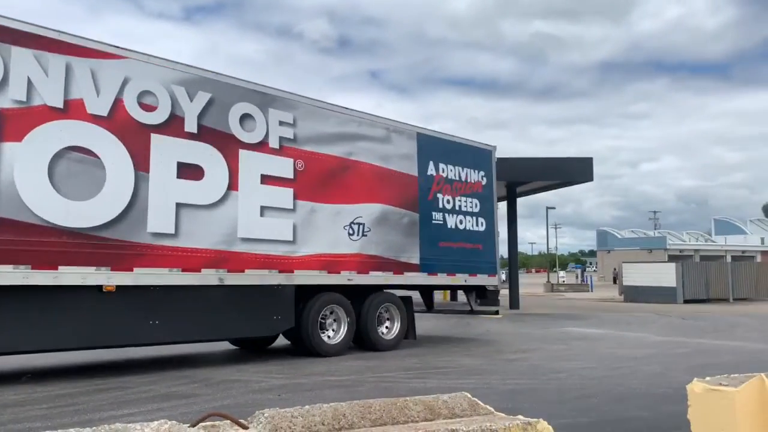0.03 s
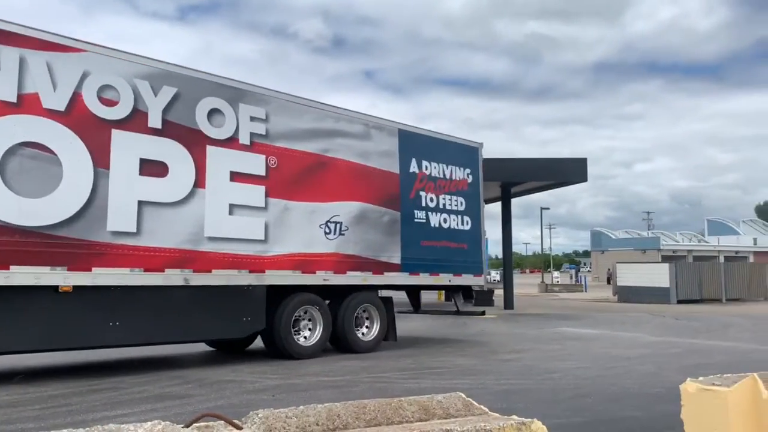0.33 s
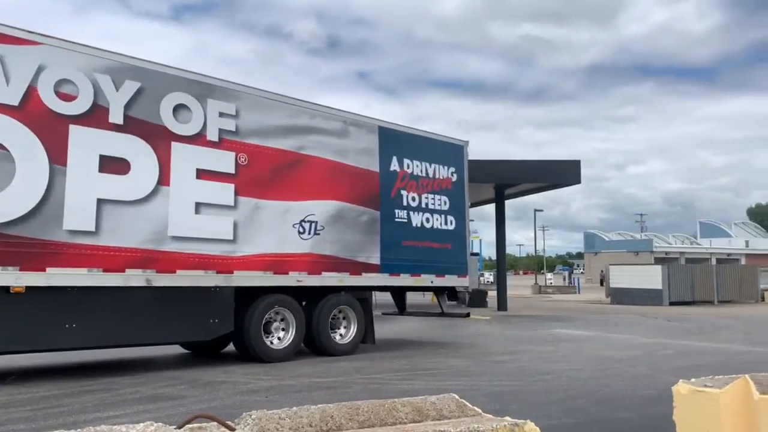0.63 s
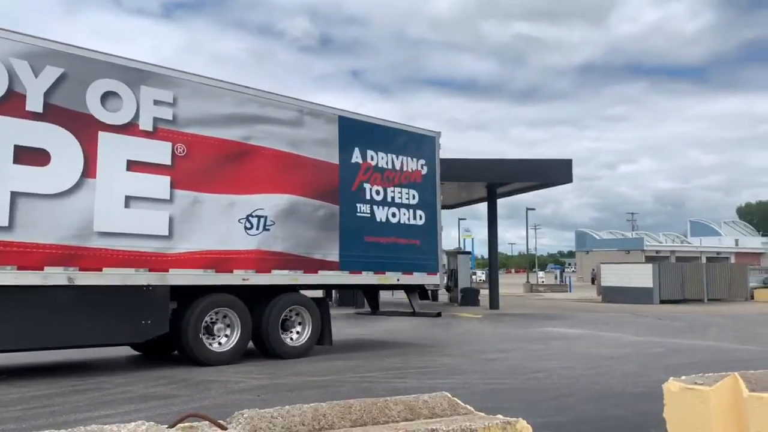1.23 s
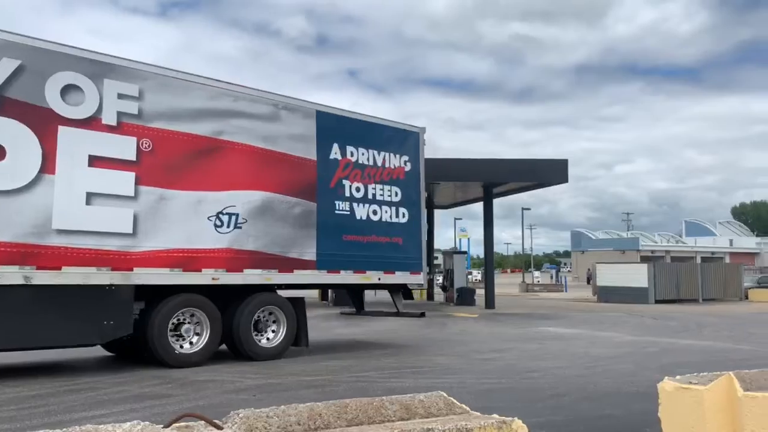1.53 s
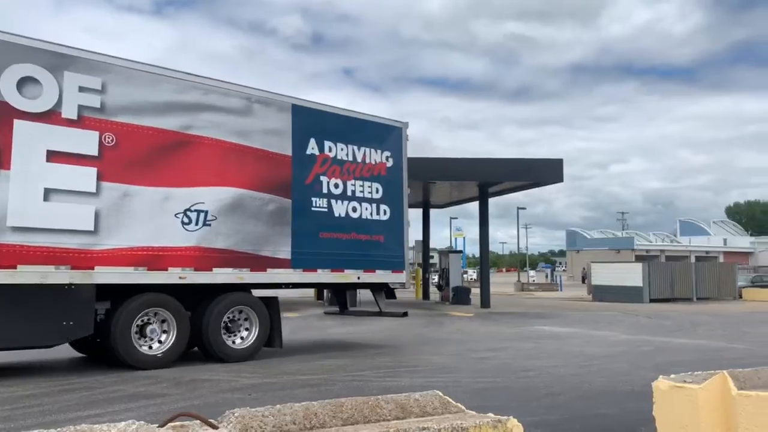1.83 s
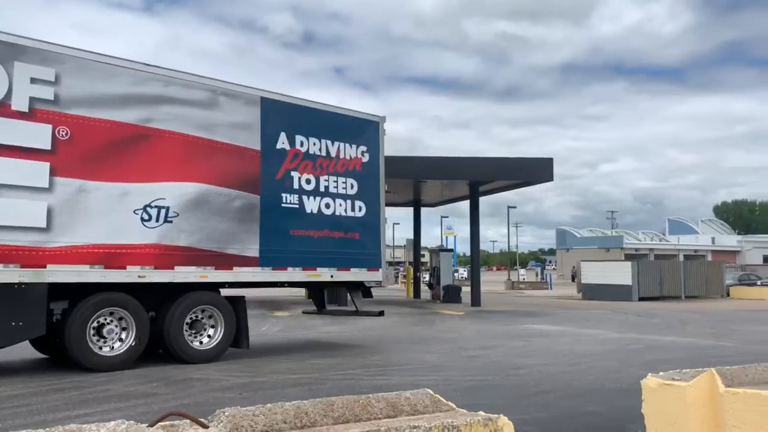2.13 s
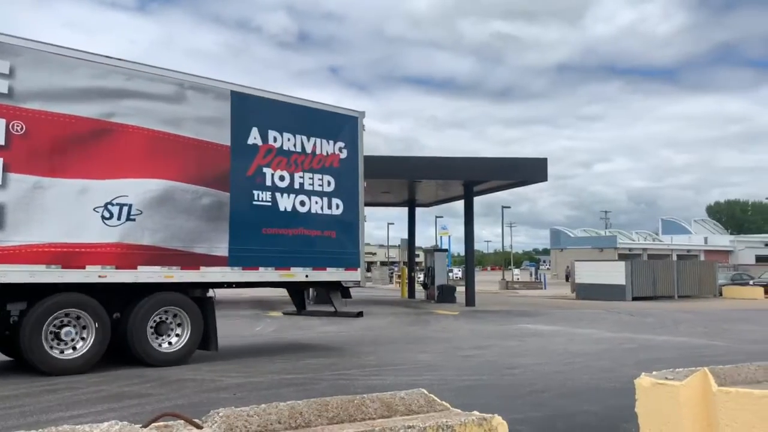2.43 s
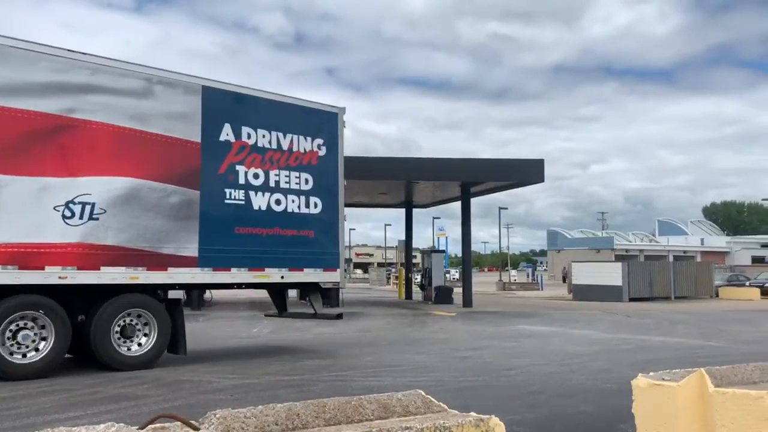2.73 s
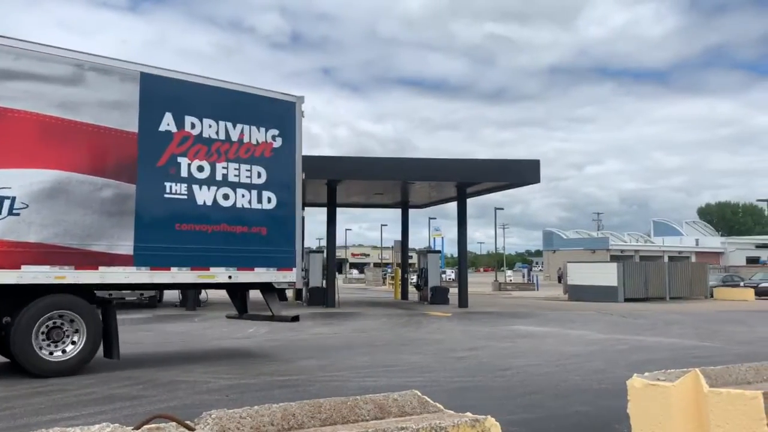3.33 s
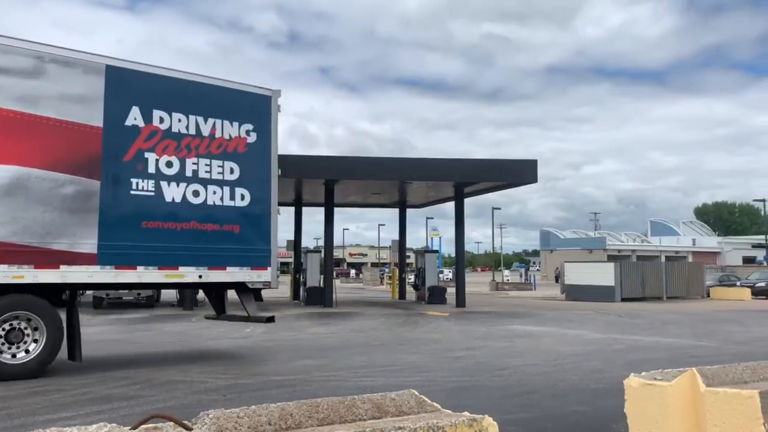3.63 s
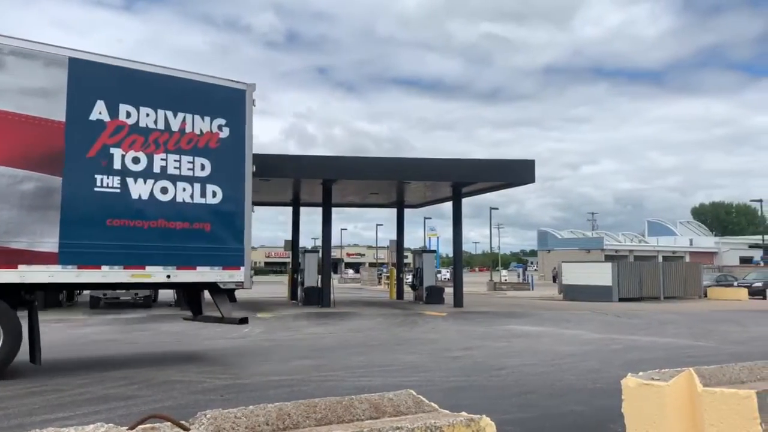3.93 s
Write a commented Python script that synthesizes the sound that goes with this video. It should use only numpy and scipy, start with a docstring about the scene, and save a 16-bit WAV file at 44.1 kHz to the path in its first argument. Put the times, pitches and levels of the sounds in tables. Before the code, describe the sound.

A diesel truck and trailer pass slowly, with rumbling, light chirping and a thin whine.

```python
"""A diesel truck hauls its trailer slowly past on the left of a paved lot, exhaust droning over tyre noise.
From the start a second diesel idles nearby, its deep rumble throbbing five times a second, a turning
part chirps, and a machine hum and a thin, wandering whine carry on throughout. At 1.3 s the trailer
thumps and the drone starts to recede. At 3 s a loose fitting clanks and the drone briefly returns,
then a gritty rush swells as the trailer's tail comes by."""
import sys
import numpy as np
from scipy.fft import rfft, irfft, next_fast_len
from scipy.io import wavfile
from scipy.ndimage import map_coordinates

SR = 44100
rng = np.random.default_rng(int(sys.argv[2]) if len(sys.argv) > 2 else 0)


def put_to_file(sound):
    """Save the sound as 16-bit audio at rate SR, in the file named by the first command-line argument."""
    columns = np.atleast_2d(sound).T  # one column per channel
    safe = np.clip(columns, -1, 1)
    whole_steps = np.round(safe * 32767)
    wavfile.write(sys.argv[1], SR, whole_steps.astype(np.int16))


N = 176400

# How alike the two channels of a noise are: frequency_hz, correlation
STEREO_LIKENESS = [(50, .995), (170, .97), (280, .9), (420, .8), (500, .7), (700, .9), (950, .78),
                   (1150, .35), (1450, .72), (1680, .78), (1940, .35), (2420, .93), (2950, .85),
                   (3170, .52), (3350, .8), (4300, .75), (5000, .52), (5500, .15), (8000, .4)]
# Left channel's level over the right: frequency_hz, gain_db
LEFT_BALANCE = [(60, -1.8), (170, 0.5), (300, 0.5), (490, 5.5), (750, 3.5), (1000, 2), (1230, 2),
                (1550, -2), (2300, .6), (2700, -3), (3400, -0.1), (4250, -0.8), (4800, -5), (5450, 3.5),
                (5850, -3), (8000, 1.5)]
# Left channel's phase lead: frequency_hz, lead_rad
LEFT_LEAD = [(0, 0), (250, 0.7), (750, 1.7), (950, 1.7), (1170, 2.7), (1350, 1.9), (1600, 3.7), (1880, 5),
             (2020, 3.4), (2250, 5.7), (3000, 8.3), (3600, 9.5), (3900, 11.7), (4300, 12.4), (5100, 14.3),
             (5300, 16.5), (6000, 18), (8400, 19)]
# Machine hum: time_s, pitch_hz, level_db
HUM_CURVE = [(0, 297, -64), (.6, 297, -53), (1.2, 300, -51), (2.2, 298.9, -54), (2.7, 300.8, -49.5),
             (3.3, 301, -49.5), (4, 301, -48)]
# Glide of the whine: time_s, pitch_hz
WHINE_PITCH = [(0, 8950), (.17, 9280), (.3, 9290), (.4, 9050), (.58, 9400), (.75, 9540), (.92, 9430),
               (1.03, 9510), (1.15, 9380), (1.21, 9180), (1.32, 9070), (1.46, 9400), (1.66, 9620),
               (1.82, 9510), (1.93, 9580), (2.15, 9490), (2.26, 9310), (2.4, 9360), (2.57, 9130),
               (2.85, 9040), (2.97, 9250), (3.14, 9330), (3.27, 9570), (3.38, 9600), (3.47, 9480),
               (3.52, 9230), (3.62, 9510), (3.8, 9790), (3.88, 9800), (4, 9480)]
# Fader ride on the whine: time_s, level_db
WHINE_FADER = [(0, -68), (.2, -53), (.41, -60), (.6, -48), (.85, -53), (1.0, -52), (1.3, -53.5),
               (1.44, -58), (1.68, -50), (1.8, -56.5), (2.05, -50.5), (2.3, -57.5), (3.15, -58.5),
               (3.35, -44.5), (3.52, -53.5), (3.66, -45), (3.86, -46.5), (4, -46.5)]
# Fader rides on idle rumble, tyres and body, and diesel clatter: time_s, rumble_db, body_db, clatter_db
NOISE_FADERS = [(0, -37.5, -40, -46.5), (.4, -43, -40.5, -46.5), (.85, -42.5, -39, -48),
                (1.3, -46.5, -41.5, -47.5), (1.7, -44.5, -41, -49.5), (2.2, -48.5, -42.5, -49),
                (2.7, -40.5, -42.5, -49), (3.2, -44.5, -42, -49), (3.6, -44.5, -43, -50),
                (4, -43.5, -41, -50)]
# Partials of the idling diesel: cycle_multiple, level_db
IDLE_PARTIALS = [(6, -70), (9, -47), (11, -57.5), (12, -44.5), (13, -52.5), (17, -49.5), (20, -51.5),
                 (37, -60.5)]
# Fader ride on those partials: time_s, gain_db
THROB_FADER = [(0, -0.5), (.7, .5), (1.8, 3.5), (2.3, -0.5), (2.8, -3.5), (3.3, -1), (4, -6)]
# Colour of the idle rumble: frequency_hz, gain_db
RUMBLE_EQ = [(15, -27), (32, -16.5), (42, -5), (50, -6.5), (62, 1), (78, -2.5), (100, -7), (130, -7),
             (200, -19.5), (400, -49.5)]
# Fader rides on the two gear tones: time_s, low_tone_db, high_tone_db
GEAR_FADERS = [(0, -46, -57), (.35, -57.5, -57), (.6, -54, -63), (.9, -51.5, -48), (1.4, -76, -64),
               (2.7, -66, -54.5), (4, -70, -63)]
# Chirps of the turning part: peak_s, level_db
CHIRP_CUES = [(0.047, -39.5), (0.225, -38), (.41, -40.5), (.595, -41.5), (.777, -38.5), (0.963, -45),
              (1.147, -43), (1.333, -38), (1.519, -39), (1.701, -40), (1.887, -42.5), (2.07, -44),
              (2.257, -38.5), (2.442, -40), (2.626, -43), (2.81, -42), (2.992, -40.5), (3.176, -40.5),
              (3.542, -47), (3.91, -43)]
# Rubs within one revolution: delay_s, gain_db
CHIRP_RUBS = [(0, -2), (.032, -10.5), (0.118, -9.5)]
# Fader ride on the rush of the trailer's tail: time_s, level_db
TAIL_FADER = [(0, -82), (3.3, -64.5), (3.6, -49), (3.88, -43.5), (4, -57.5)]
# Throaty colour of that rush: frequency_hz, gain_db
TAIL_EQ = [(420, -5), (800, -8), (930, 6), (1050, -3.5), (1620, -11), (1760, 0), (1900, -22), (5000, -34)]
# Strikes of the loose fitting: start_s, level_db
CLANK_CUES = [(3.013, -37), (3.0165, -36), (3.0215, -34.5), (3.032, -42)]
# Ring of its steel: pitch_hz, gain_db
STEEL_MODES = [(1880, -7), (2340, -3), (2520, 4.5), (2830, -2.5), (4010, -6.5)]
# Colour of its crack and echo: frequency_hz, gain_db
CLANK_EQ = [(800, -12), (1400, 1), (1850, 3.5), (2080, -7.5), (2480, 3.5), (2850, 1), (3300, -4),
            (4000, -14), (5000, -15.5), (8000, -29)]
# Hollow ring of the trailer: pitch_hz, gain_db, t60_s
TRAILER_MODES = [(244, 6.5, 0.055), (1190, -12, .04)]
# Colour of the truck's tyres and body: frequency_hz, gain_db
BODY_EQ = [(60, -40), (120, 1), (180, 1), (270, -4.5), (400, -6), (520, -6.5), (610, -3.5), (680, -1.5),
           (780, -6), (870, -4.5), (1020, -8.5), (1400, -8.5), (2000, -21), (4000, -49.5)]
# Colour of its diesel clatter: frequency_hz, gain_db
CLATTER_EQ = [(600, -26), (1300, -3.5), (1660, 5.5), (1920, 1), (2200, 3.5), (2500, 5.5), (2720, 4),
              (2930, 6.5), (3080, -1), (3600, -0.5), (3780, -1), (4300, -3), (4500, -5), (5100, -7.5),
              (5330, -7), (5650, -12.5), (6050, -7.5), (6500, -15), (7200, -26), (8400, -8.5),
              (9900, -32.5)]
# Panels and pipes ringing within the clatter: pitch_hz, gain_db
PANEL_RINGS = [(1770, -10), (2520, -11.5), (2930, -17.5), (4050, -18.5)]
# The truck's engine: time_s, firing_hz, overtones_db
ENGINE_CURVE = [(0, 69.83, -41), (.55, 69.66, -37.5), (.9, 69.85, -39.5), (1.3, 70, -39.5),
                (1.7, 70.3, -48), (2.2, 69.77, -48), (2.7, 70.2, -48.5), (3.1, 69.9, -43),
                (3.6, 70.45, -54.5), (4, 71.2, -59)]
# Overtones of its exhaust: firing_multiple, gain_db
EXHAUST_OVERTONES = [(2, -2.5), (3, -12), (4, -15.5), (5, -17), (7, -21.5)]


def amp(db):
    """Decibels to gain."""
    return 10 ** (np.asarray(db) / 20)


def unit(x):
    """Scale to rms 1."""
    return x / np.sqrt(np.mean(np.abs(x) ** 2) + 1e-20)


def along(points, hz):
    """Read (frequency_hz, value) points on a log frequency axis."""
    freqs, values = np.transpose(points)
    return np.interp(np.log(hz + 1), np.log(freqs + 1), values)


def curves(rows):
    """Automation: one value per sample for each column after the time."""
    times, *columns = np.transpose(rows)
    return [np.interp(np.arange(N) / SR, times, column) for column in columns]


def wobble(rate):
    """A smooth random curve, rate knots a second."""
    knots = rng.standard_normal(int(N * rate / SR) + 4)
    return map_coordinates(knots, [np.arange(N) * rate / SR])


def phase_of(hz):
    """Running phase of a pitch curve."""
    return 2 * np.pi * np.cumsum(hz) / SR


def filtered(x, response):
    """Pass x through a complex frequency response."""
    size = next_fast_len(N + SR // 2)
    return irfft(rfft(x, size) * response(np.fft.rfftfreq(size, 1 / SR)), size)[..., :N]


def rush(eq):
    """Coloured stereo noise of rms 1, partly alike in the two channels."""
    def response(hz):
        width = np.arccos(np.clip(along(STEREO_LIKENESS, hz), -1, 1)) / 2
        return amp(along(eq, hz)) * np.array([np.cos(width), np.sin(width)])
    mid, side = filtered(rng.standard_normal((2, N)), response)
    return unit(np.array([mid + side, mid - side]))


def tone(phase, flutter_db=1.3, drift_rad=.2):
    """A slightly unsteady tone of rms 1."""
    flutter = amp(flutter_db * wobble(9.1))
    return unit(flutter * np.sin(phase + rng.uniform(0, 2 * np.pi) + drift_rad * wobble(6.8)))


def narrow(centre_hz, width_hz):
    """A thin noise band of rms 1, reaching width_hz either side of a fixed or moving centre."""
    a, b = filtered(rng.standard_normal((2, N)), lambda hz: 1 / np.sqrt(1 + (hz / width_hz) ** 6))
    phase = phase_of(np.full(N, centre_hz))
    return unit(a * np.cos(phase) + b * np.sin(phase))


def from_left(x):
    """Sound from the left reaches the left microphone first, with a different colour on each side."""
    half = np.array([[.5], [-.5]])
    def response(hz):
        lead = np.interp(hz, *np.transpose(LEFT_LEAD))
        return amp(half * along(LEFT_BALANCE, hz)) * np.exp(1j * half * lead)
    return filtered(x, response)


def hum():
    """A machine holds one nearly steady note."""
    hz, db = curves(HUM_CURVE)
    return amp(db) * tone(phase_of(hz))


def whine(wander_hz=22, jitter_hz=31.11, compression_smear_db=-58.5):
    """A fuzzy high whistle wanders in pitch; a smear of audio-compression hiss sits just below it."""
    (hz,), (db,) = curves(WHINE_PITCH), curves(WHINE_FADER)
    hz = hz + wander_hz * wobble(18)
    core = unit(np.sin(phase_of(hz + jitter_hz * wobble(70))))
    whistle = amp(-4) * narrow(hz, width_hz=110) + amp(-1.5) * core
    return amp(db + wobble(22.05)) * whistle + amp(compression_smear_db) * narrow(hz - 120, width_hz=234)


def idling_diesel(cycle_hz=4.995, beat_s=.19, swell_depth=.65, chug_depth=.5):
    """Unequal cylinders swell tones and rumble once a cycle and chug unevenly on each crank turn."""
    cycle = 2 * np.pi * cycle_hz * (np.arange(N) / SR - beat_s)
    rumble_db, throb_db = curves(NOISE_FADERS)[0], curves(THROB_FADER)[0]
    throb = sum(amp(db) * unit(np.cos(k * cycle + .15 * wobble(2.8))) for k, db in IDLE_PARTIALS)
    rumble = amp(rumble_db) * unit(1 + swell_depth * np.cos(cycle)) * rush(RUMBLE_EQ)
    chug = unit(1 + chug_depth * np.cos(2 * cycle + .8 * wobble(7)))
    return chug * (amp(throb_db) * throb + rumble)


def gears(pitches_hz=(390, 719)):
    """Two fuzzy drive-train tones come and go, fading as the truck leaves."""
    return sum(amp(db) * narrow(hz, width_hz=10.8) for hz, db in zip(pitches_hz, curves(GEAR_FADERS)))


def chirps(pitch_hz=1385, half_width_s=.0084, left_lead_s=.00016, rough_rad=.18):
    """A turning part rubs once a revolution: a rough chirp and two fainter ones, a little to the left."""
    t = np.arange(N) / SR + np.array([[left_lead_s], [0]])
    out = np.zeros((2, N))
    rubs = [(peak_s + delay_s, db + gain) for peak_s, db in CHIRP_CUES for delay_s, gain in CHIRP_RUBS]
    scrape = rough_rad * wobble(300)
    for peak_s, db in rubs:
        hz = pitch_hz * (1 + .006 * rng.standard_normal())
        near = np.abs(t[1] - peak_s) < .05
        age = t[:, near] - peak_s
        envelope = amp(db) * np.exp(-(age / half_width_s) ** 2)
        out[:, near] += envelope * np.sin(2 * np.pi * hz * age + scrape[near])
    return out


def tail_rush(grit_db=2.5):
    """A throaty, gritty rush grows as the trailer's tail comes by."""
    grit = unit(amp(grit_db * wobble(90)))
    return amp(curves(TAIL_FADER)[0]) * grit * rush(TAIL_EQ)


def clank(attack_s=.0006, crack_db=-5.5, echo_db=-9):
    """A loose steel fitting rattles: each strike cracks, rings briefly and echoes under the trailer."""
    t = np.arange(N) / SR
    starts, levels = np.transpose(CLANK_CUES)
    age = np.maximum(t - starts[:, None], 0)
    strikes = amp(levels)[:, None] * (1 - np.exp(-(age / attack_s) ** 2))
    def decay(t60_s):
        return np.linalg.norm(strikes * amp(-60 * age / t60_s), axis=0)  # strikes add in power
    ring = unit(sum(amp(db) * np.sin(2 * np.pi * hz * (t + rng.uniform())) for hz, db in STEEL_MODES))
    crack_and_echo = amp(crack_db) * decay(t60_s=.015) + amp(echo_db) * decay(t60_s=.25)
    return ring * decay(t60_s=.041) + rush(CLANK_EQ) * crack_and_echo


def thump(start_s=1.287, gain_db=-22, attack_s=.0078):
    """A hollow, soft-edged knock from the trailer."""
    age = np.maximum(np.arange(N) / SR - start_s, 0)
    ring = sum(amp(gain_db + db - 60 * age / t60_s) * np.sin(2 * np.pi * hz * age)
               for hz, db, t60_s in TRAILER_MODES)
    return (1 - np.exp(-age / attack_s)) * ring


def truck(fundamental_db=-44, pulse_depth=.043, ring_flicker_db=3.5):
    """The exhaust drones at the firing rate, over tyre noise and clatter that pulses with the firings."""
    firing_hz, overtones_db = curves(ENGINE_CURVE)
    _, body_db, clatter_db = curves(NOISE_FADERS)
    firing = phase_of(firing_hz)
    fundamental = amp(fundamental_db) * tone(firing)  # the lowest note carries as the truck drives off
    overtones = amp(overtones_db) * sum(amp(db) * tone(k * firing) for k, db in EXHAUST_OVERTONES)
    body = amp(body_db + 1.2 * wobble(14)) * rush(BODY_EQ)
    pulse = 1 + pulse_depth * np.cos(firing + .43 * wobble(31))
    grain = amp(wobble(260) + .51 * wobble(16))
    rings = sum(amp(db) * unit(amp(ring_flicker_db * wobble(15)) * narrow(hz, width_hz=70))
                for hz, db in PANEL_RINGS)
    clatter = amp(clatter_db) * unit(pulse * grain) * (rush(CLATTER_EQ) + rings)
    return fundamental + overtones + body + clatter


def scene():
    """The mix: trucks and hum from the left, chirps just left of centre, the whine in the middle."""
    lot = truck() + idling_diesel() + gears() + hum() + tail_rush() + thump() + clank()
    return from_left(lot) + chirps() + whine()


def record(dry, top_hz=10100):
    """A brick-wall low-pass takes off the top end."""
    return filtered(dry, lambda hz: hz < top_hz)


dry = scene()
out = record(dry)
put_to_file(out)
```